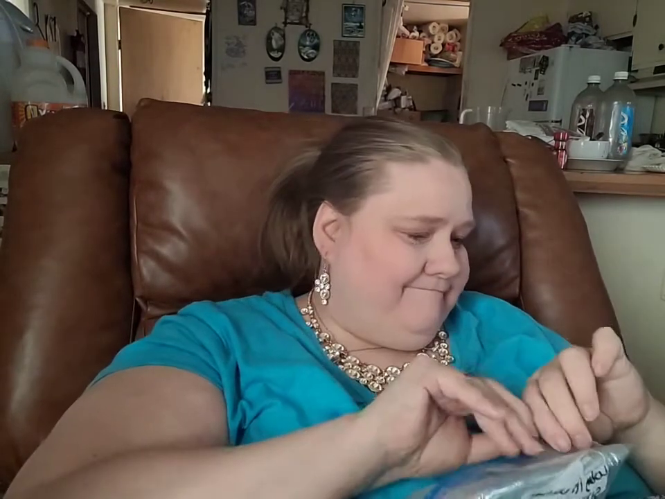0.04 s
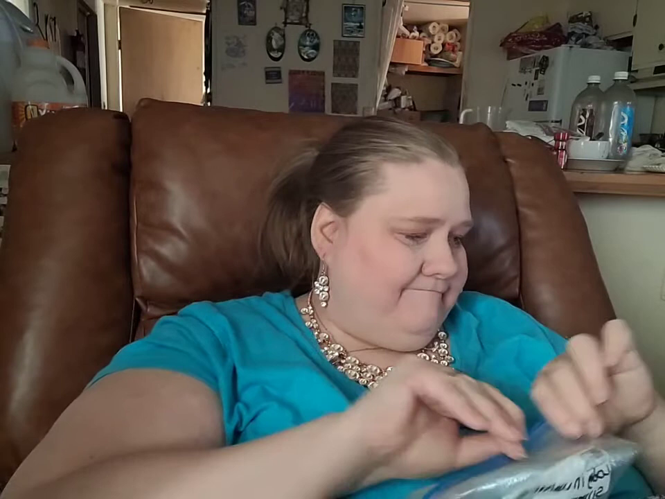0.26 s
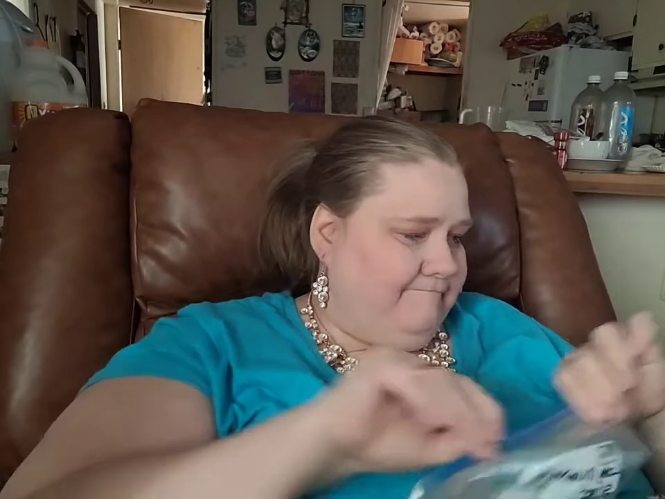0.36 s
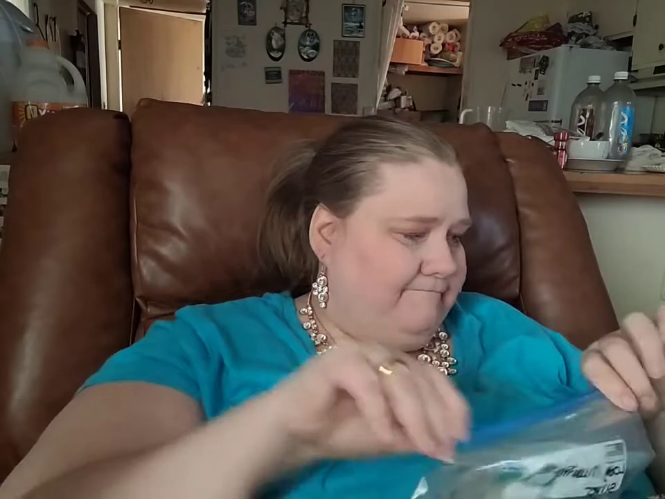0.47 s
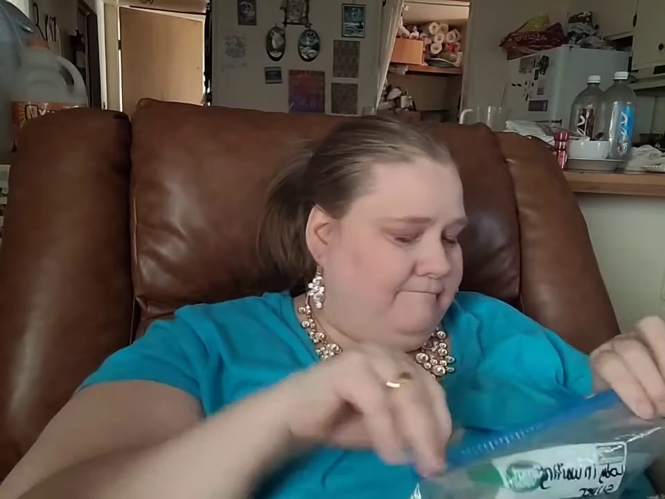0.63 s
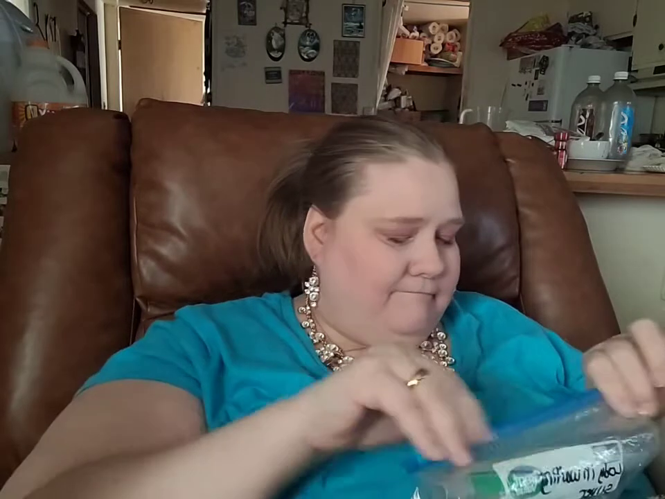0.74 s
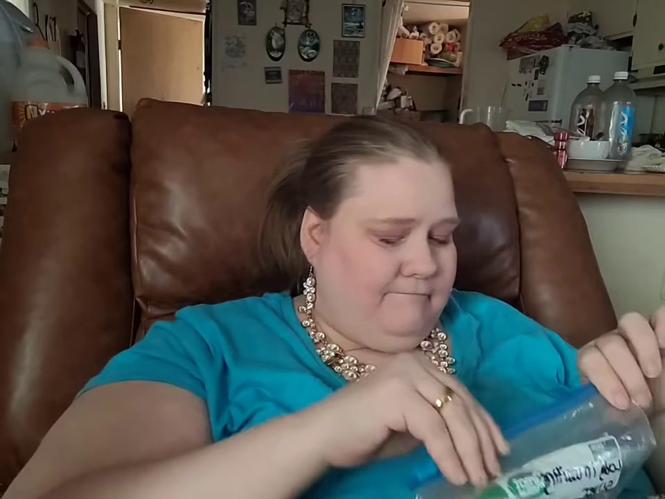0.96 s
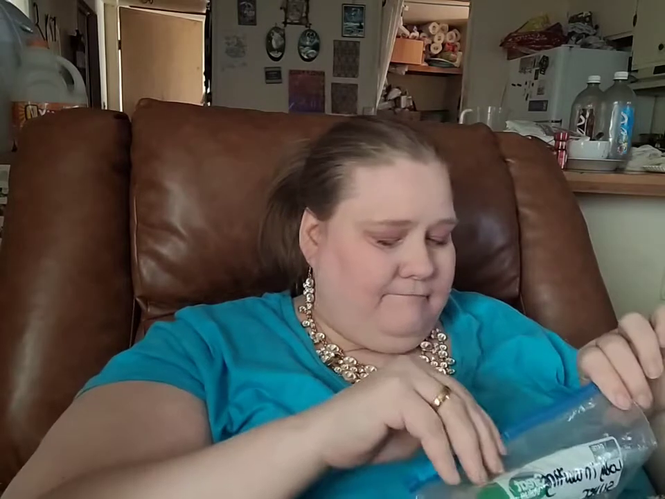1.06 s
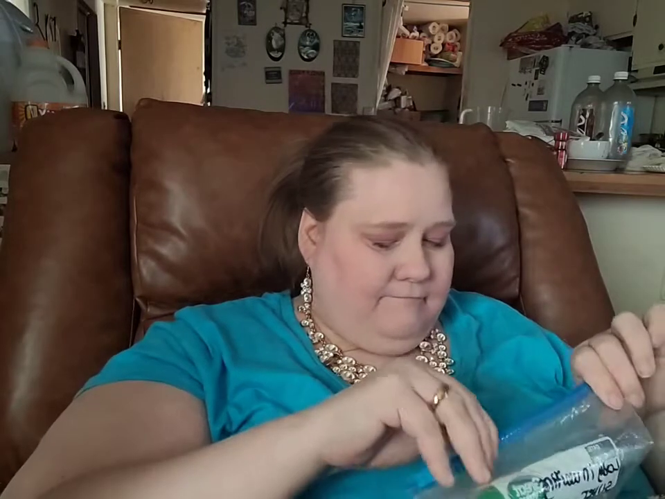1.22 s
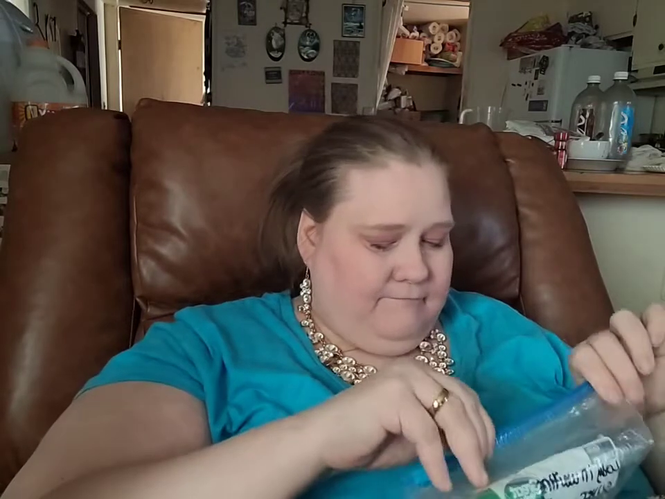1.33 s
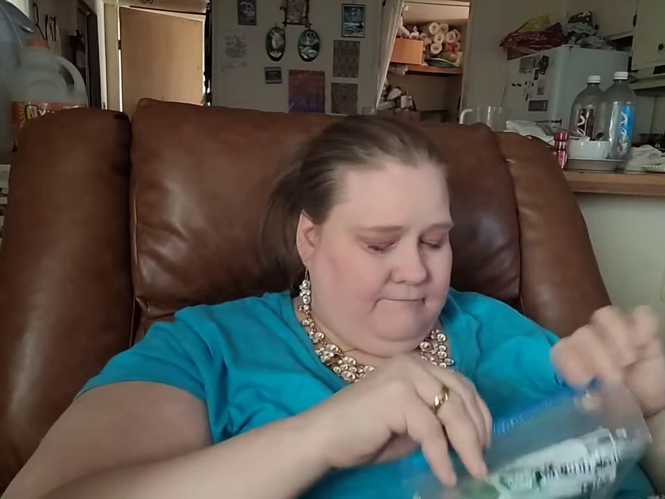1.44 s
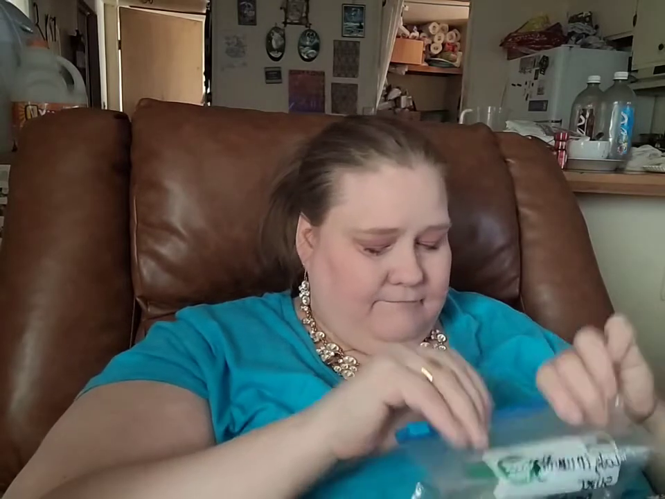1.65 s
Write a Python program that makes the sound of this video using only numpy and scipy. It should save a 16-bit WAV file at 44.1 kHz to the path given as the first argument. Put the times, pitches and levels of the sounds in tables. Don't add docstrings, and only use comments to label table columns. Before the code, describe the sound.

Plastic bag crinkling close up, with a sharp double pop of the seal, then lighter crackles

```python
import sys
import numpy as np
from scipy import signal
from scipy.fft import rfft, irfft
from scipy.io import wavfile
from scipy.ndimage import uniform_filter1d

SR = 44100
rng = np.random.default_rng(int(sys.argv[2]) if len(sys.argv) > 2 else 0)


def nominal_scale(level):
    x = np.asarray(level, float) / 20
    return 10 ** x


def pcm_store(signal):
    levels = np.round(np.clip(np.atleast_2d(signal), -1, 1) * 32767)
    wavfile.write(sys.argv[1], SR, levels.astype(np.int16).T)


N = 74970
t = np.arange(N) / SR


def unit(x):
    return x / np.sqrt(np.mean(x ** 2))


def band(x, lo_hz, hi_hz):
    return signal.sosfilt(signal.butter(3, [lo_hz, min(hi_hz, .47 * SR)], "band", fs=SR, output="sos"), x)


def shape(table, hz):
    table_hz, table_db = np.array(table).T
    return np.interp(np.log(hz), np.log(table_hz), table_db)


def fade(t60, size):
    return np.exp(-np.log(1000) * np.arange(size) / SR / t60)


def add(out, x, s):
    i = int(s * SR)
    out[i:i + len(x)] += x[:len(out) - i]


def room_air():
    # frequency in Hz, density in dB per Hz.
    air_spectrum = [(15, -36), (25, 0.5), (55, -2), (143, 5), (196, -9), (324, -0.5), (1900, -65),
                    (11500, -39), (13800, -28.5)]
    hz = np.maximum(np.arange(N // 2 + 1) * SR / N, 1)
    spectrum = rfft(rng.standard_normal(N)) * nominal_scale(shape(air_spectrum, hz)) * (hz > 18)
    return unit(irfft(spectrum, N)) * nominal_scale(-63)


def refrigerator():
    # frequency in Hz, pitch waver in Hz, level in dB.
    hum_tones = [(59.7, 3.7, -57), (90.7, 3.2, -70.5), (143.3, 1.44, -65.5)]
    # time in seconds, level in dB.
    compressor_load = [(0.0, -49.5), (0.08, -63.5), (0.202, -56), (0.24, -70), (0.374, -60), (0.5, -84),
                       (0.538, -62), (0.912, -67), (0.942, -53.5), (1.174, -66.5), (1.376, -52),
                       (1.486, -65), (1.604, -57), (1.7, -59.5)]
    load_s, load_db = np.array(compressor_load).T
    load = nominal_scale(uniform_filter1d(np.interp(t, load_s, load_db) + 58, size=800))
    out = np.zeros(N)
    for k, (hz, waver_hz, db) in enumerate(hum_tones):
        waver = uniform_filter1d(rng.standard_normal(N), size=2000)
        waver = unit(uniform_filter1d(waver, size=2000))
        tone = np.sqrt(2) * np.sin(2 * np.pi * np.cumsum(hz + waver_hz * waver) / SR)
        swell = load if k == 0 else nominal_scale(1.3 * waver[::-1])
        out += tone * nominal_scale(db) * swell
    return out


def thuds():
    # time in seconds, peak in dB, pitch in Hz.
    knocks = [(0.176, -48, 310), (0.3903, -40, 800), (0.3926, -38, 500), (0.4215, -41, 330),
              (0.4304, -27, 430), (0.5458, -30, 650), (0.6215, -33, 700), (0.6712, -42, 340),
              (0.9182, -47, 880), (1.004, -42, 500), (1.1532, -51, 1150), (1.2405, -43, 550),
              (1.2939, -48, 800), (1.3527, -48, 1200), (1.4511, -46, 1000), (1.5765, -47, 1100),
              (1.5798, -46, 500), (1.5848, -41, 600), (1.5924, -40, 380), (1.6086, -42, 1100),
              (1.6193, -45, 400),
              (0.1071, -48, 470), (0.1884, -46, 540), (0.3267, -46, 990), (0.3676, -43, 310),
                   (0.5412, -33, 720), (0.5732, -37, 760), (0.6407, -39, 640), (0.7355, -52, 1500),
                   (1.2069, -54, 940), (1.4582, -49, 1230), (1.4832, -52, 1340), (1.5123, -56, 1380),
                   (1.5539, -56, 1260), (1.5988, -44, 1350)]
    rise_cycles, size = .31, 4000
    overtone_ratio, overtone_db = 2.19, -8.5
    tail_db, tail_t60_s = -12.5, 0.056
    out = np.zeros(N)
    for s, db, hz in knocks:
        u = t[:size] * hz / rise_cycles
        phase = 2 * np.pi * rise_cycles * (u - 1)
        pocket = np.cos(phase) * u * np.exp(1 - u)
        overtone = np.cos(overtone_ratio * phase) * u * np.exp(1 - u / 2) / 2
        tail = unit(band(rng.standard_normal(size), hz / 1.32, hz * 1.48)) * fade(tail_t60_s, size)
        thud = pocket + nominal_scale(overtone_db) * overtone + nominal_scale(tail_db) * tail
        add(out, nominal_scale(db) * thud, s - rise_cycles / hz)
    return band(out, 125, 7300)


def rings():
    # time in
    # seconds, peak in dB, pitch in Hz, t60 in seconds.
    modes = [(.269, -44, 4500, 0.013), (0.4314, -35, 230.3, 0.043), (.4355, -34.5, 874, 0.044),
             (.5445, -27, 2463, 0.038), (.5437, -31, 1785, 0.073), (.5437, -29, 5900, 0.069),
             (.484, -47, 2300, .02), (.1082, -35, 5000, 0.016), (.5555, -34.5, 944, 0.049),
             (.576, -39, 3010, .04), (.6185, -38, 626, 0.048), (.622, -42, 1420, 0.06),
             (1.0046, -48, 4000, .012), (1.1979, -46.5, 2780, 0.021), (1.3076, -45.5, 3220, 0.025),
             (1.4071, -42, 2600, .02), (1.6152, -56, 2880, 0.0078)]
    rise_s, wobble_rad, size = 0.000993, .6, 5000
    out, u = np.zeros(N), t[:size]
    for s, db, hz, t60 in modes:
        drift = uniform_filter1d(rng.standard_normal(size), size=int(4 * SR / hz))
        wobble = wobble_rad * unit(drift)
        tone = np.sin(2 * np.pi * hz * u + wobble - wobble[0])
        envelope = fade(t60, size) * (1 - np.exp(-u / rise_s))
        add(out, nominal_scale(db) * tone * envelope, s - rise_s)
    return out


def snaps():
    # time in seconds, peak in dB,
    # middle share in dB, top share in dB.
    folds = [(0.0649, -61, 8, -1), (0.1071, -37, 0, -5), (0.1172, -49, 0, -7), (0.127, -37, -16, -3),
             (0.1316, -35, -14, -12), (0.2178, -32, -4, 2), (0.2207, -44, -1, 0),
             (0.257, -41, -5, -1), (0.269, -46, 2, 9), (0.3922, -49, 5, 2), (0.4275, -36, 0, -3),
             (0.4324, -40, -1, 2), (0.4427, -44, -16, -6), (0.4456, -45, 2, -9), (0.4835, -50, 6, 8),
             (0.5162, -58, 6, -11), (0.5281, -49, -12, 4), (0.7394, -52, 1, -6),
             (0.8002, -47, -15, 1), (0.8815, -61, 1, 7), (0.912, -52, 4, 1), (0.9701, -56, -3, 1),
             (1.0039, -52, 11, 0), (1.0218, -56, 1, 5), (1.0259, -44, -12, -2), (1.0344, -67, 8, 16),
             (1.099, -57, -8, 2), (1.1363, -41, -15, 2), (1.1419, -39, -19, 4),
             (0.5391, -19, -6, -4),
        (0.5437, -20, 0, -10),
        (0.5489, -36, 8, 14),
        (0.5584, -32, 4, -1),
        (0.5725, -33, -1, 3),
        (0.6074, -38, -9, 7),
        (0.6197, -43, 3, 0),
        (0.6307, -38, 1, 0),
        (0.6366, -39, 2, 1),
        (0.6709, -54, 12, 4),
             (1.1977, -60, 15, 3), (1.2395, -47, 2, 2), (1.2495, -48, -13, 2), (1.2937, -53, 6, -5),
                  (1.3037, -47, -5, 5), (1.3209, -42, -12, -2), (1.3374, -39, -8, 9), (1.3661, -36, -13, 2),
                  (1.3728, -46, 2, 11), (1.386, -43, -12, 9), (1.3893, -40, -11, 4), (1.407, -39, 0, 6),
                  (1.4507, -57, 12, -10), (1.5137, -60, 4, -5), (1.5541, -62, 2, -11), (1.5981, -38, -5, 1),
                  (1.6044, -48, -16, 6), (1.6093, -54, 6, 2), (1.6152, -50, 9, -12), (1.6304, -40, -1, 1),
                  (1.6388, -55, 3, 7), (1.6592, -52, 7, 0), (1.6766, -53, -14, 1), (1.6857, -58, -3, -2),
                  (1.6996, -44, -15, 9),
             (0.1355, -46, -12, 2), (0.1394, -48, -6, -4), (0.2793, -41, -5, -4),
                   (0.2976, -45, -12, -10), (0.3162, -55, 4, 8), (0.3193, -50, 3, 0), (0.3241, -49, 5, -2),
                   (0.3293, -42, -3, -9), (0.4578, -48, -6, -8), (0.5412, -25, -4, -4),
                   (0.5463, -28, 0, -8), (0.5514, -30, 0, -8), (0.6135, -42, 5, 2), (0.6248, -42, 6, -2),
                   (0.7005, -51, -1, -3), (0.8066, -54, -3, 1), (0.8512, -63, 7, -2),
                   (0.9183, -51, -7, -10), (0.9437, -56, -1, -3), (1.0573, -59, -2, 4),
                   (1.132, -46, -15, 4), (1.1392, -43, -15, 1), (1.1525, -50, -6, 8), (1.2155, -55, -7, 2),
                   (1.3337, -42, -5, -3), (1.3443, -51, -6, 8), (1.4868, -60, 0, 13), (1.577, -59, -1, 0),
                   (1.5853, -53, 1, -4), (1.5903, -51, 4, -2)]
    tick_db, snap_db, lead_s, size = 14.5, 1, .0003, 2500
    crack_t60_s, tail_db, tail_t60_s = .0095, -23, 0.055
    decay = fade(crack_t60_s, size) + nominal_scale(tail_db) * fade(tail_t60_s, size)
    out = np.zeros(N)
    for s, db, mid_db, top_db in folds:
        noise = rng.standard_normal((3, size))
        noise[:, 0] = nominal_scale(tick_db) * np.sign(noise[0, 0])
        noise *= decay
        body = band(noise[0], 5000, 9000)
        middle = band(noise[1], 2300, 5000)
        top = band(noise[2], 9000, 15500)
        crack = body / np.abs(body).max()
        crack += nominal_scale(mid_db) * middle / np.abs(middle).max()
        crack += nominal_scale(top_db) * top / np.abs(top).max()
        add(out, crack * nominal_scale(db + snap_db), s - lead_s)
    return out


def creases():
    # time in seconds, effort in dB, brightness in dB per octave.
    hands = [(0, -64, -2), (.1, -72.5, -3), (0.131, -57, -0.5), (.2, -55, 0), (.4, -55, -2.5),
             (.44, -56, -4), (.475, -69, -3.5), (.6, -60, -5), (.72, -60.5, -0.5), (.86, -64.5, -3),
             (1.0, -64.5, -2.5), (1.12, -72, -4.5), (1.25, -62.5, -1), (1.33, -55.5, 1.5), (1.412, -52, 1),
             (1.5, -68, -2), (1.57, -72.5, -6.5), (1.7, -63.5, -1.5)]
    # start in seconds, level in dB, attack in
    # seconds, # release t60 in seconds, centre in Hz.
    slips = [
        (.5435, -29.5, 0.00087, 0.25, 2350),
        (.539, -29, .0005, 0.023, 1700),
        (0.32, -48, 0.069, 0.42, 13000),
        (.6, -32.5, 0.016, 0.24, 1420),
        (1.128, -44.5, 0.017, .2, 7700),
        (1.574, -47.5, 0.022, 0.37, 1000),
        (.424, -38.5, 0.0038, 0.13, 940),
    ]
    # frequency in Hz, density in dB per Hz.
    film = [(120, -33), (200, -1.5), (655, -1), (1680, -6.5), (2470, -7), (3650, -6.5), (5900, -8.5),
            (8550, -6.5), (13800, -13.5)]
    creases_per_s, scatter_db, spread_oct, crease_t60_s = 1900, 2.4, 0.74, 0.0069
    rustle_db, slip_grain = 1, .3
    slip_above_db_per_oct, slip_below_db_per_oct = 4, 5.5
    hands_s, effort_db, bright_db = np.array(hands).T
    effort_db, bright_db = np.interp(t, hands_s, effort_db), np.interp(t, hands_s, bright_db)
    when, strength, colour = rng.random((int(creases_per_s * N / SR), 3)).T
    at = (when * N).astype(int)
    size = nominal_scale(-scatter_db * np.log(1.01 - strength))
    pitch_oct = 3.5 - 6 * colour
    out = np.zeros(N)
    for hz in 250 * 2 ** np.arange(0, 6.1, .5):
        octave = np.log2(hz / 3000)
        share = np.exp(-((pitch_oct + octave) / spread_oct) ** 2)
        clicks = np.bincount(at, size * share, N)
        gate = unit(signal.fftconvolve(clicks, fade(crease_t60_s + 6 / hz, size=1500))[:N])
        handling = nominal_scale(effort_db + bright_db * octave)
        power = (handling * unit(gate + nominal_scale(rustle_db))) ** 2
        for s, db, attack_s, release_s, centre_hz in slips:
            late = np.clip(t - s, 0, None)
            above = np.log2(hz / centre_hz)
            off_db = max(slip_above_db_per_oct * above, -slip_below_db_per_oct * above)
            slip = nominal_scale(db - off_db - 60 * late / release_s) * np.clip(late / attack_s, 0, 1)
            power = power + (slip * unit(1 + slip_grain * gate)) ** 2
        noise = unit(band(rng.standard_normal(N), hz / 1.19, hz * 1.19))
        out += noise * np.sqrt(power * hz / 14000) * nominal_scale(shape(film, hz) + 5.5)
    return out


def soft_echo(bag):
    echo_db, echo_t60_s, size = -14, 0.5, 12000
    echo = rng.standard_normal(size) * fade(echo_t60_s, size) * (t[:size] > .003)
    echo /= np.sqrt(np.sum(echo ** 2))
    return nominal_scale(echo_db) * signal.fftconvolve(bag, echo)[:N]


def scene():
    background = room_air() + refrigerator()
    bag = thuds() + rings() + snaps() + creases()
    return (bag + soft_echo(bag) + background)[None]


def top_cut(x):
    return signal.sosfilt(signal.butter(12, 15190, fs=SR, output="sos"), x)


def record(dry):
    # centre in Hz, width in Hz, gain in dB.
    mic_colour = [(7610, 620, 4.5), (8610, 1220, -4), (12000, 1900, 4)]
    hz = np.arange(N // 2 + 1) * SR / N
    gain_db = sum(db * np.exp(-((hz - f) / width) ** 2) for f, width, db in mic_colour)
    coloured = irfft(rfft(dry) * nominal_scale(gain_db), N)
    mix = signal.sosfilt(signal.cheby1(12, .5, 13900, fs=SR, output="sos"), coloured)
    return top_cut(mix)


dry = scene()
out = record(dry)
pcm_store(out)
```